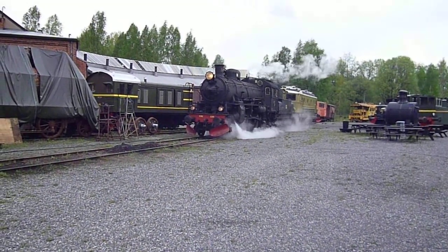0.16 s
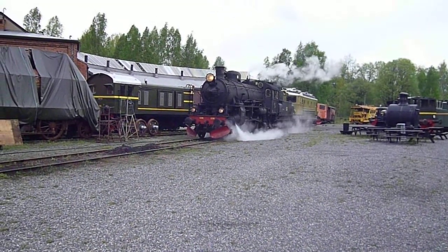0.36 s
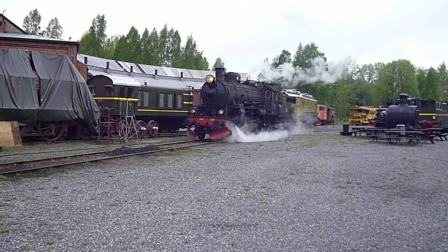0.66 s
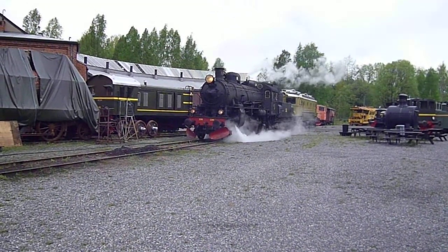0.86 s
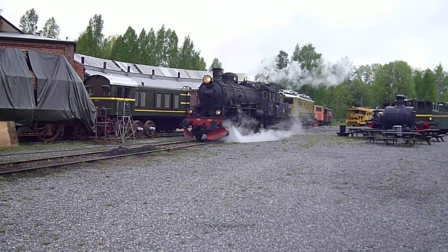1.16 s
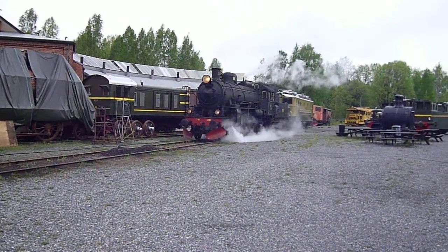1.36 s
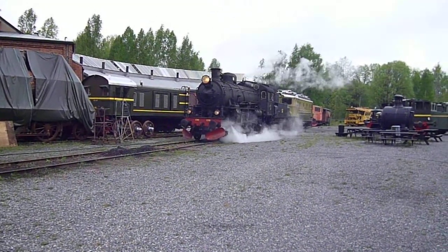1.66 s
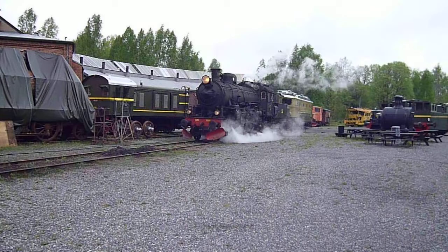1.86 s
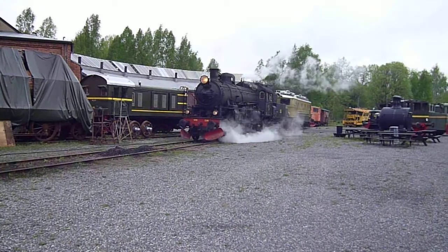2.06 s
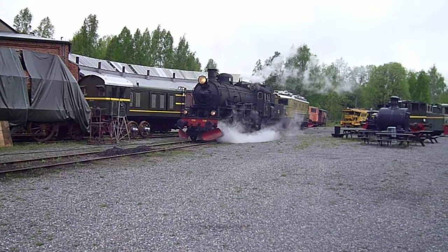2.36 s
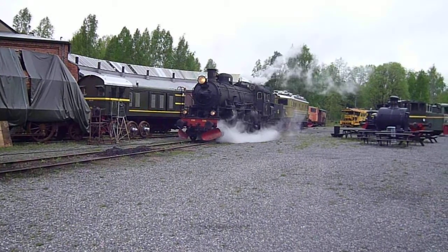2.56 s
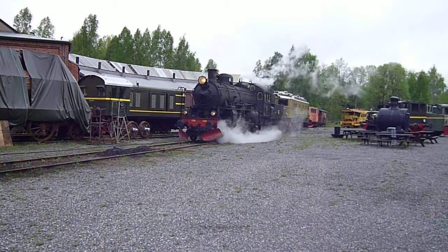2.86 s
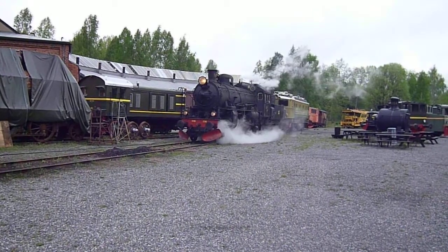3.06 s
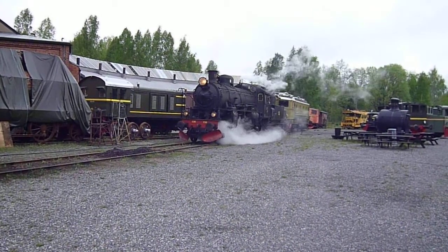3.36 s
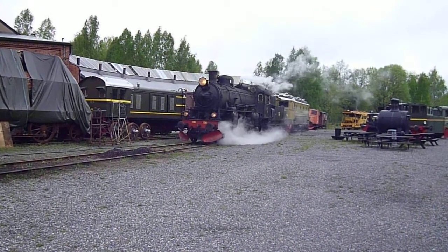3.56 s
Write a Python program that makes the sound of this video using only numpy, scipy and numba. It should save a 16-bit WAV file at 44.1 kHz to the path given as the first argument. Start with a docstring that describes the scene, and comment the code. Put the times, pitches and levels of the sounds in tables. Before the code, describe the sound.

A standing steam locomotive hisses steadily over a faint low boiler drone in a railway yard. Wind gusts thump on the microphone, briefly dipping the hiss, and one ringing metal clank comes about halfway through.

```python
"""A standing steam locomotive hisses through its open cylinder drain cocks over a low boiler drone.
From the start, gusts thump on the single microphone, hardest near 0.8 s; the gain control ducks
the hiss after each loud blow and lets it swell back. At 1.8 s slack in the running gear closes
with one ringing clank. The jet hisses on, and a last flurry of gusts lands near 3.5 s."""
import sys
import numpy as np
from scipy import signal
from scipy.fft import rfft, irfft
from scipy.io import wavfile
from scipy.ndimage import uniform_filter1d
from numba import njit

SR = 44100
rng = np.random.default_rng(int(sys.argv[2]) if len(sys.argv) > 2 else 0)


def log_audio(samples):
    """Write samples as a 16-bit WAV file to the path given in sys.argv[1]."""
    # one column per channel
    frames = np.atleast_2d(samples).T
    # limit to full scale, then quantise
    limited = np.clip(frames, -1, 1)
    pcm = np.round(limited * 32767).astype(np.int16)
    wavfile.write(sys.argv[1], SR, pcm)


N = 163170
T = np.arange(N) / SR

# Tone of the steam jet. Each row: frequency in Hz, relative level in dB.
JET_EQ = [(30, -4.5), (60, 2), (110, -12), (220, -3), (400, -4), (900, -3.5), (1300, -6.5), (2400, -2),
          (4300, -2), (5400, 0), (7000, -3), (7800, -9), (8400, -18), (9000, -39.5)]
# Resonances of the cocks and pipes, broad then narrow. Each row: centre in Hz, width in Hz, lift in dB.
COCK_RESONANCES = [(1030, 46, 2.5), (1620, 50, 2.5), (1974, 200, 4.5), (2718, 173, 6.5), (3312, 280, 8),
                   (4064, 100, 3), (4670, 240, 2), (5260, 78, 3.5), (6710, 110, 3), (892, 8.5, 5.5),
                   (937, 5.3, 3), (2078, 20, 3.5), (2252, 5.8, 7.5), (2542, 78, 5), (2840, 30, 5),
                   (3030, 53, 5), (3267, 91, -0.5), (3530, 19, 4.5), (5670, 28, 5)]
# Steam flow. Each row: time in seconds, trim of the hiss in dB, trim of the lower roar in dB.
STEAM_FLOW = [(0, -2, -3), (.7, -1.5, -3), (1.1, -1.7, -3.3), (1.7, -1, -2), (2.0, -1.5, -0.7),
              (2.3, -0.1, -0.7), (2.8, 0.5, -1), (3.301, -0.9, -0.6), (3.7, 0.5, 0.7)]
JET_DB, ROAR_HZ, FLUTTER_DB, FLUTTER_HZ = -26.5, 3900, 0.79, 22

# Gusts hitting the microphone. Each row: time in seconds, level in dB, pitch in Hz, sharpness from 0 to 1.
GUST_HITS = [(.009, -9, 295, 0.23), (.030, -18, 348, 0.5), (.094, -14.5, 323, 0.68), (0.112, -10, 185, 0.2),
             (0.22, -15.5, 360, 0.04), (0.239, -20, 290, 0), (0.297, -20, 133, 0.2), (.484, -14.5, 187, 0),
             (0.635, -17, 132, 0.05), (.650, -9.5, 184, 0), (.676, -14, 163, 0.03),
             (0.699, -14.5, 233, 0.4), (0.713, -18, 174, 0), (0.757, -14, 155, 0.1),
             (0.77, -5.5, 310, 0.01), (.780, -2.5, 174, 0), (.787, -7, 280, 0.03), (.794, 2.5, 220, 0),
             (1.131, -3, 232, 0.45), (1.156, -7.5, 222, 0.53), (1.175, -15.5, 420, 0.55),
             (1.613, -22, 180, .2), (1.970, -16.5, 119, 0), (2.186, -23, 122, 0), (2.366, -11, 147, 0),
             (2.391, -30, 110, 0.1), (2.404, -18, 140, 0.1), (3.458, -10, 189, 0.13), (3.478, -9, 194, 0),
             (3.488, -12.5, 141, 0.1), (3.513, -14, 150, 0), (3.646, -20, 169, 0)]
# Tone of the turbulence round the microphone. Each row: frequency in Hz, relative level in dB.
EDDY_EQ = [(20, -23.5), (55, -0.5), (150, 3), (300, -6.5), (600, -17), (1200, -31), (3000, -62.5)]
# Rise and lull of the breeze. Each row: time in seconds, trim in dB.
BREEZE_FADES = [(0, 8.5), (1.0, 4), (1.6, -0.5), (2.3, 2.5), (2.7, -10), (3.3, -6.5), (3.7, 6)]
THUMP_CYCLES, EDGE_HZ, EDGE_CYCLES = 0.56, 540, 0.58
EDDY_DB, EDDY_S, BREEZE_DB, BREEZE_SWING_DB = -23.5, 0.021, -43, 3.5

# Contacts within the clank. Each row: start in seconds, body level in dB, crack level in dB.
GEAR_CONTACTS = [(1.805, -24.5, -30), (1.813, -25, -26), (1.821, -18.5, -12), (1.834, -19, -18),
                 (1.848, -17.5, -24), (1.866, -21, -33)]
# Tone of the clank's dull body. Each row: frequency in Hz, relative level in dB.
BODY_EQ = [(100, -11.5), (300, -6.5), (500, -7), (700, -4), (1000, -5.5), (1480, -7.5), (1800, -9.5),
           (3000, -13.5), (6000, -34), (9000, -55.5)]
# Tone of the clank's bright crack. Each row: frequency in Hz, relative level in dB.
CRACK_EQ = [(500, -12), (2000, -11), (3000, 0), (4200, -3), (6000, -10.5), (7500, -30), (9000, -61.5)]
# Ringing steel. Each row: pitch in Hz, relative level in dB, time to fall 60 dB in seconds.
STEEL_MODES = [(650, -5, 0.83), (692, -11, 0.63), (772, -13, .35), (984, -8.5, 0.66), (1324, -8, .3),
               (1470, -1, 0.19), (2010, -10, 0.9), (2712, -14, 0.34), (4300, -3.5, .09)]
BODY_T60_S, CRACK_T60_S, TICK_T60_S, YARD_T60_S = 0.1, 0.061, 0.011, 0.64
RING_DB, YARD_DB, TICK_DB = -8, -10.5, 5.5  # ring and yard relative to the body, tick to the crack

# Boiler resonances. Each row: centre in Hz, width in Hz, level in dB at the top of the swell.
BOILER_RESONANCES = [(161.6, 43, -40), (297.7, 38, -45.5)]
DRONE_SWELL_DB_PER_S = 1.1

CEILING_DB, START_GAIN, RECOVER_PER_S, ATTACK_S = -19.5, 0.22, 0.52, 0.0062
SENSE_S, SENSE_TREBLE, LOWPASS_HZ = .013, 3.23, 8950


def steam_jet():
    """Jet noise coloured by the cocks; its hiss and lower roar follow the flow and flutter."""
    freqs = bins()
    lift_db = sum(db * np.exp(-2 * ((freqs - hz) / width) ** 2) for hz, width, db in COCK_RESONANCES)
    jet = unit(yard_reflections(noise(eq_curve(JET_EQ) + lift_db)))
    roar = irfft(rfft(jet) / (1 + (freqs / ROAR_HZ) ** 8), N)
    hiss = jet - roar
    times, hiss_db, roar_db = np.array(STEAM_FLOW).T
    hiss_fader = undb(np.interp(T, times, hiss_db) + FLUTTER_DB * drift(FLUTTER_HZ))
    roar_fader = undb(np.interp(T, times, roar_db) + FLUTTER_DB * drift(FLUTTER_HZ))
    return undb(JET_DB) * (hiss * hiss_fader + roar * roar_fader)


def wind_on_microphone():
    """Each gust is a brief pressure dip, some with a sharp edge, wrapped in eddies over a light breeze."""
    thumps, eddy_power = np.zeros(N), np.zeros(N)
    for time, db, hz, sharpness in GUST_HITS:
        near = np.abs(T - time) < .08
        age = T[near] - time
        edge = sharpness * pressure_dip(age * EDGE_HZ, EDGE_CYCLES)
        thumps[near] += undb(db) * (pressure_dip(age * hz, THUMP_CYCLES) + edge)
        eddy_power[near] += undb(db) ** 2 * np.exp(-2 * (age / EDDY_S) ** 2)
    fade_db = np.interp(T, *np.array(BREEZE_FADES).T)
    breeze = undb(BREEZE_DB + fade_db + BREEZE_SWING_DB * drift(rate_hz=17))
    return thumps + (undb(EDDY_DB) * np.sqrt(eddy_power) + breeze) * noise(eq_curve(EDDY_EQ))


def pressure_dip(cycles, width):
    """One thump: the pressure drops, with a small overshoot on either side."""
    return -np.cos(2 * np.pi * cycles) * np.exp(-(cycles / width) ** 2)


def gear_clank():
    """Slack in the running gear closes in a few contacts; the steel rings and the yard answers."""
    body, crack = noise(eq_curve(BODY_EQ)), noise(eq_curve(CRACK_EQ))
    body_power, crack_power, ring = np.zeros((3, N))
    for start, body_db, crack_db in GEAR_CONTACTS:
        body_power += hit_power(start, body_db, BODY_T60_S)
        body_power += hit_power(start, body_db + YARD_DB, YARD_T60_S)
        crack_power += hit_power(start, crack_db, CRACK_T60_S)
        crack_power += hit_power(start, crack_db + TICK_DB, TICK_T60_S)
    for hz, mode_db, t60 in STEEL_MODES:
        power = sum(hit_power(start, body_db, t60) for start, body_db, _ in GEAR_CONTACTS)
        tone = np.sin(2 * np.pi * (hz * T + rng.random()))
        ring += undb(RING_DB + mode_db) * np.sqrt(power) * tone
    return ring + body * np.sqrt(body_power) + crack * np.sqrt(crack_power)


def boiler_drone():
    """The draught drones in two low resonances and slowly swells."""
    drone = np.zeros(N)
    for hz, width, db in BOILER_RESONANCES:
        bell_db = -20 * np.log10(1 + ((bins() - hz) / width * 2) ** 2)
        drone += undb(db) * noise(bell_db)
    return drone * undb(DRONE_SWELL_DB_PER_S * (T - T[-1]))


def yard_reflections(x, wet_db=-16, max_delay_s=.06):
    """Faint reflections from the ground, coaches and shed ripple the spectrum."""
    lags = (max_delay_s * SR * rng.random(16)).astype(int)
    return x + undb(wet_db) * sum(np.roll(x, lag) for lag in lags) / np.sqrt(len(lags))


def undb(db):
    """Decibels to gain."""
    return 10 ** (np.asarray(db) / 20)


def unit(x):
    """Scale to rms 1."""
    return x / np.sqrt(np.mean(x ** 2))


def bins():
    """Frequencies of the spectrum in Hz."""
    return np.arange(N // 2 + 1) * SR / N


def eq_curve(points):
    """Gain in dB at each frequency, drawn through (Hz, dB) points."""
    hz, db = np.array(points, float).T
    return np.interp(np.log(bins() + 1), np.log(hz), db)


def noise(eq_db):
    """Noise of rms 1, shaped by an EQ curve."""
    return unit(irfft(rfft(rng.standard_normal(N)) * undb(eq_db), N))


def drift(rate_hz):
    """Smooth random wobble of rms 1."""
    hold = int(SR / rate_hz)
    steps = rng.standard_normal(1024)[(np.arange(N) // hold) % 1024]
    return unit(uniform_filter1d(uniform_filter1d(steps, hold), hold))


def hit_power(start, db, t60):
    """Power envelope of a hit: instant attack, then a tail that falls 60 dB in t60 seconds."""
    age = T - start
    tail = (age >= 0) * np.exp(-np.log(1000) * np.maximum(age, 0) / t60)
    return (undb(db) * tail) ** 2


@njit
def ride_gain(allowed):
    """The gain ducks quickly to what is allowed and climbs steadily back towards unity."""
    out, gain = np.empty(len(allowed)), START_GAIN
    for i in range(len(allowed)):
        if allowed[i] < gain:
            gain += (allowed[i] - gain) / (ATTACK_S * SR)
        else:
            gain = min(gain + RECOVER_PER_S / SR, 1.)
        out[i] = gain
    return out


def scene():
    """All layers reach one microphone, the same in both channels."""
    return np.tile(steam_jet() + wind_on_microphone() + gear_clank() + boiler_drone(), (2, 1))


def record(dry):
    """Gain control, keener on treble, ducks the mix after loud blows; a steep low-pass trims the top."""
    mono = dry[0]
    treble = SENSE_TREBLE * np.diff(mono, prepend=mono[0])
    sidechain_power = uniform_filter1d(mono ** 2 + treble ** 2, int(SENSE_S * SR))
    loudness = np.sqrt(np.abs(sidechain_power) + 1e-12)
    gain = ride_gain(undb(CEILING_DB) / loudness)
    lowpass = signal.ellip(10, .2, 80, LOWPASS_HZ, fs=SR, output="sos")
    return signal.sosfilt(lowpass, dry * gain)


dry = scene()
out = record(dry)
log_audio(out)
```